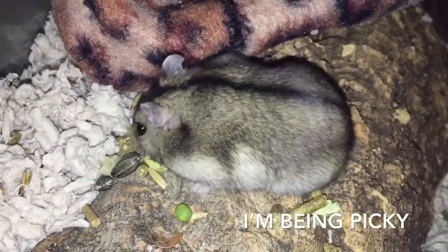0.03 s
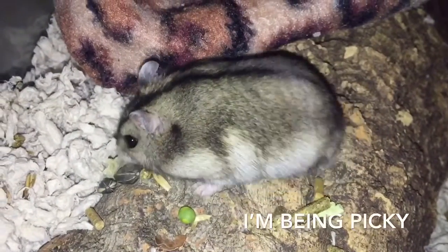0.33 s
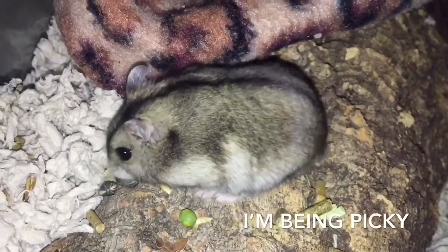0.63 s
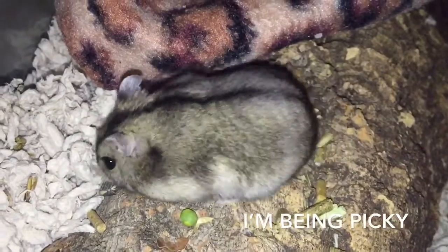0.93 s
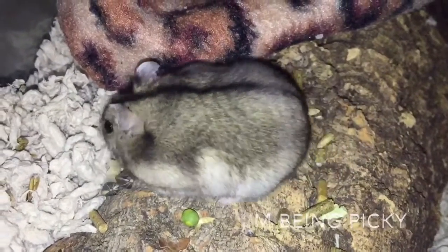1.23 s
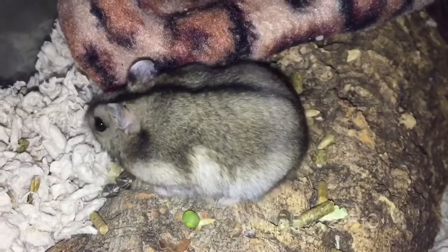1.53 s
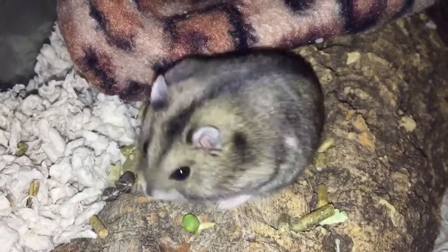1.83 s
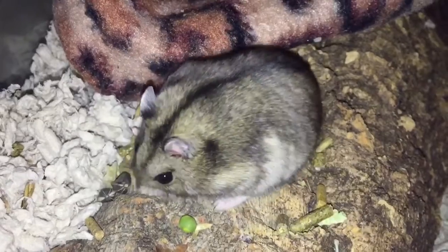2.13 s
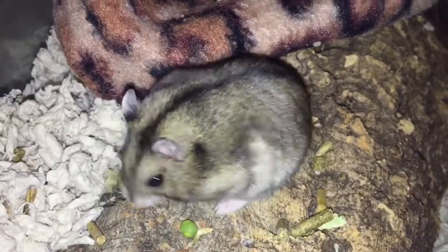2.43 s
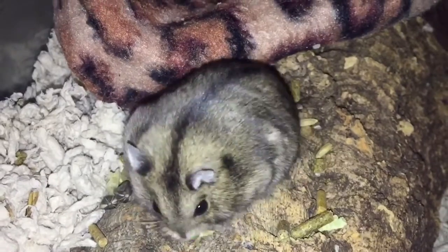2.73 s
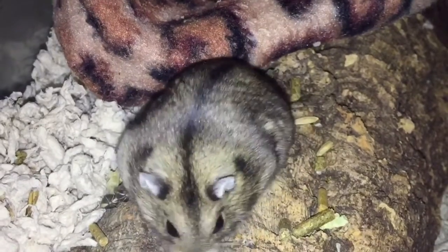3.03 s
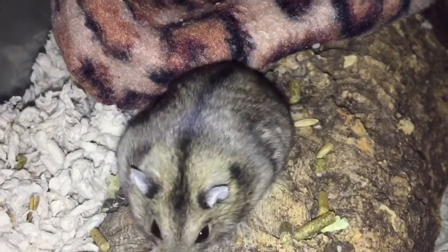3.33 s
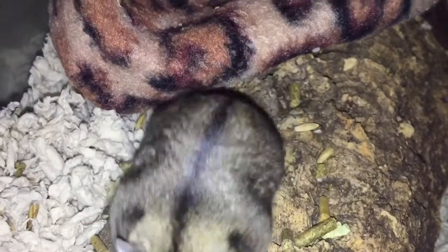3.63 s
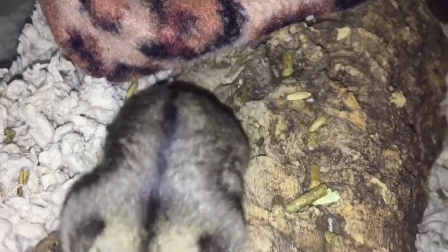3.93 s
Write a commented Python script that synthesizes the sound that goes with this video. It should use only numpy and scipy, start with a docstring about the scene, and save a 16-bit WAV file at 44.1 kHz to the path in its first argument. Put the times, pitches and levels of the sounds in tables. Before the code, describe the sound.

Faint clicks and rustles of a hamster with seeds, heard close indoors over low hum and hiss. Light paw scuffs and a dull double thump on the enclosure come first, then tiny husk cracks and a brief claw scrape.

```python
"""Hamster handling seeds on bark

Close up in a quiet room, paws scuff over bark and bedding, each stroke a swell of tiny slips.
Shifts of weight stir the enclosure's panels, and a soft double bump sets them ringing.
Husks snap, each leaving a brief hollow ring; at the end claws drag over the bark.
Mains hum, a low rumble, hiss and a faint whine lie underneath."""
import sys
import numpy as np
from scipy import signal
from scipy.fft import rfft, irfft
from scipy.io import wavfile

SR = 44100
rng = np.random.default_rng(int(sys.argv[2]) if len(sys.argv) > 2 else 0)


def store_pcm(level_fs):
    """Save levels as 16-bit WAV."""
    pcm = np.round(np.clip(level_fs, -1, 1) * 32767).astype(np.int16)
    wavfile.write(sys.argv[1], SR, np.atleast_2d(pcm).T)


N = 176400

# colours of the room's rumble and hiss (frequency [Hz], relative level [dB])
RUMBLE_COLOUR = [(20, -59), (30, -41), (39, -3.5), (49, -11), (59, 4.5), (65, -4.5), (73, 6.5), (88, -8.5),
                 (110, -9), (150, -18.5), (185, -22), (215, -27), (260, -31.5), (400, -54.5), (1000, -83)]
HISS_COLOUR = [(180, -27), (300, -1), (418, -5), (462, -6.5), (502, -6), (612, -5), (825, -8.5), (927, -8),
               (974, -8), (1080, -8.5), (1250, -10), (1430, -10.5), (1950, -9.5), (3380, -12.5),
               (3990, -12.5), (4870, -16), (5940, -14.5), (7620, -18.5), (8410, -16.5), (10400, -21.5),
               (12700, -20), (15000, -23), (15800, -29)]
# mains hum and faint steady tones (frequency [Hz], rms level [dB], waver depth [ratio])
HUM_TONES = [(120, -48.5, 0.025), (57.97, -65, 0.067), (181.6, -74.5, 0.17), (939.6, -85.5, 0.13)]

# scuffs of paws and seeds (time [s], length [s], bark [dB], husk [dB], bedding [dB])
SCUFFS = [(0.147, 0.14, -76, -93, -87), (0.427, 0.1, -75.5, -89, -82), (.984, 0.023, -77, -70, -75.5),
          (1.008, 0.009, -69, -67, -74), (1.179, 0.018, -69, -73, -76), (1.236, .011, -62, -66.5, -63),
          (1.243, 0.025, -74, -75, -79), (1.276, 0.0082, -65.5, -76, -84), (2.02, 0.012, -56.5, -73, -79),
          (2.029, 0.05, -76, -75, -80), (2.057, 0.018, -80, -64.5, -72), (2.078, 0.0092, -62, -62, -87),
          (2.084, 0.02, -71, -72, -75.5), (2.149, 0.019, -83, -67, -91), (2.165, 0.055, -68.5, -64.5, -85),
          (2.204, 0.035, -77, -77, -92), (2.327, 0.041, -68.5, -70, -97), (2.782, 0.012, -68, -69, -67),
          (2.797, 0.031, -80, -75, -77), (3.258, 0.017, -87, -69, -81)]
# colours of dull bark, papery husk and crisp bedding (frequency [Hz], relative level [dB])
BARK_COLOUR = [(150, -0.5), (320, 2), (700, -0.5), (1100, -3.5), (1600, -7), (2000, -30), (4000, -33),
               (9000, -39)]
HUSK_COLOUR = [(700, -85), (1350, -13), (1550, 5), (1800, 7.5), (2300, 9.5), (2600, -22.5), (3400, -2.5),
               (4500, -40), (12000, -37)]
BEDDING_COLOUR = [(1200, -23), (3000, 2), (6000, -2), (8500, -10.5), (10400, -18), (12000, -22),
                  (15500, -17)]
# shifts of weight that stir one panel (time [s], length [s], level [dB], pitch [Hz])
WEIGHT_SHIFTS = [(.5, 0.15, -53, 170.4), (.62, 0.15, -69, 227), (1.31, 0.088, -67.5, 248),
                 (2.06, 0.15, -60, 241.7), (2.27, 0.11, -63.5, 234.5), (2.84, .14, -60.5, 242),
                 (3.56, 0.14, -65, 236)]
# rub on a hollow shell (time [s], length [s], level [dB])
SHELL_RUBS = [(0.983, .032, -64)]
# resonances of that shell (frequency [Hz], relative level [dB])
SHELL_COLOUR = [(600, -27), (800, -14), (870, 6), (960, -19), (1270, -15), (1380, 5.5), (1500, -23),
                (2000, -19), (2300, -8), (2440, 1), (2600, -10), (3000, -15), (5000, -23.5)]

# bumps on the enclosure (time [s], thud [dB], knock [dB], panel ring gain [dB])
BUMPS = [(1.4753, -25, -43.5, -35.5), (1.5608, -39, -53.5, -44.5)]
# modes of the panels (frequency [Hz], relative level [dB], t60 [s])
PANEL_MODES = [(169.3, 7.5, 0.24), (185.3, -11, 0.36), (217.9, -2.5, 0.39), (233.7, -7, 0.51),
               (306, -12.5, 0.15), (510, -29, 0.17)]
# boxy colour of the knock (frequency [Hz], relative level [dB])
KNOCK_COLOUR = [(150, -12), (330, 2), (430, -8), (510, 1), (740, -1), (830, -19), (1200, -40), (3000, -90)]

# husk cracks (time [s], ring peak [dB], low mode [Hz], middle mode [Hz], main mode [Hz], snap [dB])
CRACKS = [(2.0225, -56, 675, 1580, 2350, -71), (2.0803, -49.5, 1550, 1520, 2360, -60),
          (2.1695, -50, 930, 1650, 2000, -78), (2.1800, -48, 930, 1750, 2090, -80),
          (2.1940, -47, 905, 1780, 2040, -74), (2.4467, -40.5, 965, 1860, 2080, -46),
          (2.5352, -48.5, 1180, 1820, 2250, -59), (2.5378, -49.5, 1150, 1710, 1910, -63),
          (2.543, -45, 1180, 1690, 2230, -60), (2.6296, -53.5, 1060, 1900, 2270, -62),
          (2.6395, -34, 1000, 1666, 2234, -43), (2.7284, -53, 940, 2000, 2200, -60),
          (2.7423, -44, 910, 1750, 2500, -53), (2.7469, -40.5, 940, 1680, 2400, -45.5),
          (2.7495, -32, 915, 1860, 2286, -61), (2.863, -58.5, 930, 1780, 2370, -61),
          (3.0735, -56.5, 885, 1740, 2030, -71), (3.0778, -55, 920, 2010, 2280, -72),
          (3.165, -60.5, 875, 1800, 1950, -60)]
# bright colour of the snap (frequency [Hz], relative level [dB])
SNAP_COLOUR = [(500, -30), (2700, 2), (3700, -0.5), (4800, -12), (6200, -1.5), (7600, -8), (9000, -2.5),
               (10400, -16), (11800, -3.5), (15500, 1.5)]
# modes of a held seed: low, middle, main and two overtones (relative level [dB], t60 [s])
SEED_MODES = [(-10, 0.023), (-4.5, 0.023), (2, 0.019), (-6.5, 0.014), (-23, 0.028)]
SEED_OVERTONES = (1.227, 1.61)  # ratios to the main mode

# thin, high tick (time [s], length [s], level [dB])
TICKS = [(3.706, 0.0097, -73)]
# colour of that tick (frequency [Hz], relative level [dB])
TICK_COLOUR = [(5000, -35), (9000, -6), (13000, -23), (14500, 9), (15500, -21), (17000, -19)]
# claws dragged over the bark (time [s], length [s], rasp [dB], ring [dB])
CLAW_DRAGS = [(3.840, 0.014, -59, -67.5), (3.848, 0.013, -57, -64), (3.86, 0.0078, -60, -62),
              (3.868, 0.02, -63, -72), (3.884, 0.0048, -55, -80), (3.889, 0.028, -64, -80),
              (3.908, .011, -60, -70.5)]
# narrow ring of a claw (frequency [Hz], relative level [dB])
CLAW_COLOUR = [(1500, -38), (2200, -14), (2380, 7), (2500, -25), (2700, -29), (3600, -20), (5000, -34)]


def amp(db):
    """Decibels to gain."""
    return 10 ** (np.asarray(db) / 20)


def add(mix, start_s, sound):
    """Lays a sound into the mix."""
    part = mix[round(start_s * SR):][:len(sound)]
    part += sound[:len(part)]


def coloured(x, colour):
    """Shapes x with an EQ curve and scales it to rms 1."""
    hz, db = np.transpose(colour)
    bins_hz = np.fft.rfftfreq(len(x), 1 / SR)
    curve = amp(np.interp(np.log(bins_hz + 1), np.log(hz), db))
    shaped = irfft(rfft(x) * curve, len(x))
    return shaped / np.sqrt(np.mean(shaped ** 2) + 1e-20)


def noise(colour, size=N):
    """Coloured noise at rms 1."""
    return coloured(rng.standard_normal(size), colour)


def room_tone(rumble_db=-50.5, hiss_db=-72.5):
    """The bed: low rumble, even hiss, and slightly wavering mains hum and whine."""
    t = np.arange(N) / SR
    out = amp(rumble_db) * noise(RUMBLE_COLOUR) + amp(hiss_db) * noise(HISS_COLOUR)
    slow_drift = [(1, 1.5), (5, 1), (30, -30.5), (200, -120)]
    for hz, db, depth in HUM_TONES:
        waver = 1 + depth * (noise(slow_drift) + 1j * noise(slow_drift))  # in level and phase
        out += amp(db) * np.sqrt(2) * (waver * np.exp(2j * np.pi * hz * t)).real
    return out


def stroke(length_s, colour, slips_per_s=3100, spread_db=1, skew=0.72, size=8192):
    """Friction: a short swell of tiny slips heard through a resonant body."""
    slipping = rng.random(size) < slips_per_s / SR
    strength = amp(spread_db * np.minimum(rng.exponential(1, size), 4))
    direction = rng.choice([-1., 1.], size)
    grains = coloured(slipping * direction * strength, colour)
    progress = np.minimum(np.arange(size) / SR / length_s, 1)
    swell = np.sin(np.pi * progress ** skew)
    scrape = grains * swell
    return scrape * np.sqrt(np.sum(swell ** 2) / np.sum(scrape ** 2))


def paw_scuffs():
    """Paws and seeds slip over bark, husks and bedding, three textures in each scuff."""
    out = np.zeros(N)
    for start, length, bark_db, husk_db, bedding_db in SCUFFS:
        add(out, start, amp(bark_db) * stroke(length, BARK_COLOUR))
        add(out, start, amp(husk_db) * stroke(length, HUSK_COLOUR))
        add(out, start, amp(bedding_db) * stroke(length, BEDDING_COLOUR))
    return out


def weight_shifts(width_hz=36):
    """Shifting weight stirs a panel into a soft swell of low, narrow-band noise."""
    out, t = np.zeros(N), np.arange(SR) / SR
    sway_colour = [(1, 0), (width_hz / 2, 0), (width_hz, -10), (10 * width_hz, -70)]
    for start, length, db, hz in WEIGHT_SHIFTS:
        sway = noise(sway_colour, len(t))
        swell = np.sin(np.pi * np.minimum(t / length, 1))
        add(out, start, amp(db) * swell * sway * np.sin(2 * np.pi * hz * t))
    return out


def shell_rub():
    """A rub excites the resonances of a hollow shell."""
    out = np.zeros(N)
    for start, length, db in SHELL_RUBS:
        add(out, start, amp(db) * stroke(length, SHELL_COLOUR))
    return out


def enclosure_bumps(thud_hz=147, thud_width_s=0.0059, thud_lag_s=0.00668, ring_rise_s=0.015):
    """A knock and a dull thud set the enclosure's panels ringing."""
    out, t = np.zeros(N), np.arange(SR) / SR
    ring = sum(amp(db - 60 * t / t60) * np.sin(2 * np.pi * hz * t) for hz, db, t60 in PANEL_MODES)
    ring *= 1 - np.exp(-(t / ring_rise_s) ** 2)
    since_thud = t - thud_lag_s
    thud = -np.sin(2 * np.pi * thud_hz * since_thud) * np.exp(-(since_thud / thud_width_s) ** 2)
    knock = coloured(signal.unit_impulse(SR, "mid"), KNOCK_COLOUR)
    knock /= knock.max()
    for start, thud_db, knock_db, ring_db in BUMPS:
        add(out, start, amp(thud_db) * thud + amp(ring_db) * ring)
        add(out, start - .5, amp(knock_db) * knock)  # the pulse sits in the middle of its second
    return out


def seed_ring(t, pitches, rise_s=0.0016, phase_spread_cycles=0.076):
    """The hollow, fast-dying modes of a held seed, at peak 1; their pitches shift with the grip."""
    ring = np.zeros(len(t))
    for hz, (db, t60) in zip(pitches, SEED_MODES):
        cycles = hz * t + phase_spread_cycles * rng.normal()
        ring += amp(db - 60 * t / t60) * np.sin(2 * np.pi * cycles)
    ring *= 1 - np.exp(-(t / rise_s) ** 2)
    return ring / abs(ring).max()


def husk_cracks(preroll_s=.01, lead_in_s=0.0024, snap_s=0.00027, tail_s=0.0093, halo_db=-11):
    """A husk breaks with a bright snap, then the seed rings."""
    out, t = np.zeros(N), np.arange(4096) / SR
    since_snap = t - preroll_s
    # a faint hiss swells just before each snap and fades after it
    halo = np.exp(-abs(since_snap) / np.where(since_snap < 0, lead_in_s, tail_s))
    envelope = np.exp(-abs(since_snap) / snap_s) + amp(halo_db) * halo
    for start, ring_db, low_hz, middle_hz, main_hz, snap_db in CRACKS:
        pitches = [low_hz, middle_hz, main_hz] + [main_hz * ratio for ratio in SEED_OVERTONES]
        add(out, start, amp(ring_db) * seed_ring(t, pitches))
        add(out, start - preroll_s, amp(snap_db) * envelope * noise(SNAP_COLOUR, len(t)))
    return out


def thin_tick():
    """A tiny burst of slips, all top end."""
    out = np.zeros(N)
    for start, length, db in TICKS:
        add(out, start, amp(db) * stroke(length, TICK_COLOUR))
    return out


def claw_drags():
    """Claws drag over the bark: a dull rasp with a narrow ring on top."""
    out = np.zeros(N)
    for start, length, rasp_db, ring_db in CLAW_DRAGS:
        add(out, start, amp(rasp_db) * stroke(length, BARK_COLOUR))
        add(out, start, amp(ring_db) * stroke(length, CLAW_COLOUR))
    return out


def reflections(x, wet_db=-22, t60_s=.12, predelay_s=.003):
    """A short, faint tail from the nearby walls."""
    t = np.arange(SR // 2) / SR
    tail = rng.standard_normal(len(t)) * amp(-60 * t / t60_s) * (t > predelay_s)
    return amp(wet_db) * signal.fftconvolve(x, tail / np.linalg.norm(tail))[:N]


def scene():
    """Mono mix: the hamster with a touch of room, the enclosure dry, the room tone underneath."""
    hamster = paw_scuffs() + shell_rub() + husk_cracks() + thin_tick() + claw_drags()
    enclosure = weight_shifts() + enclosure_bumps()
    return (room_tone() + hamster + reflections(hamster) + enclosure)[None]


def record(dry, cutoff_hz=15900):
    """A steep low-pass trims the very top."""
    lowpass = signal.firwin(401, cutoff_hz, window=("kaiser", 8), fs=SR)
    return signal.oaconvolve(dry, lowpass[None], "same")


dry = scene()
out = record(dry)
store_pcm(out)
```